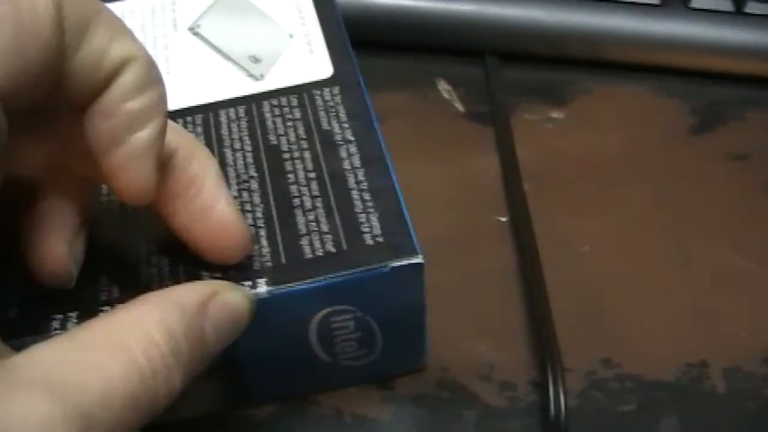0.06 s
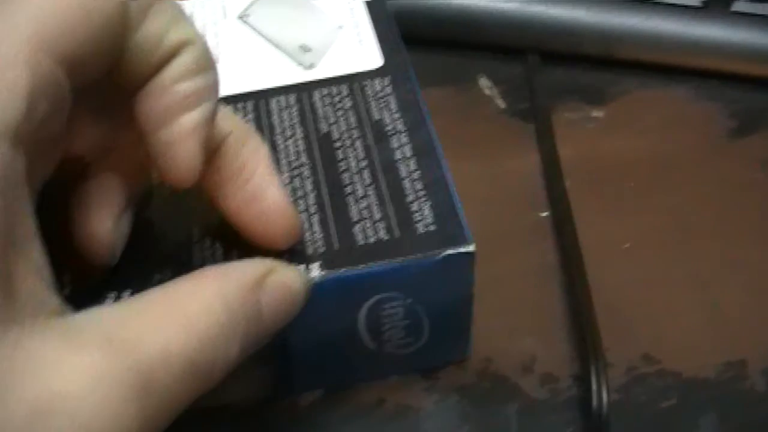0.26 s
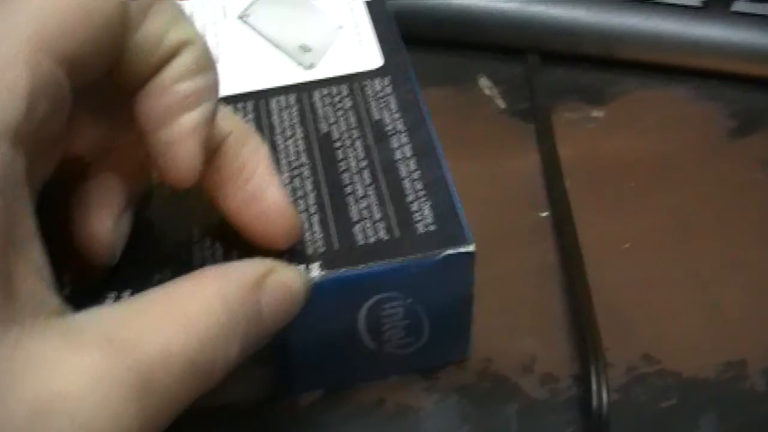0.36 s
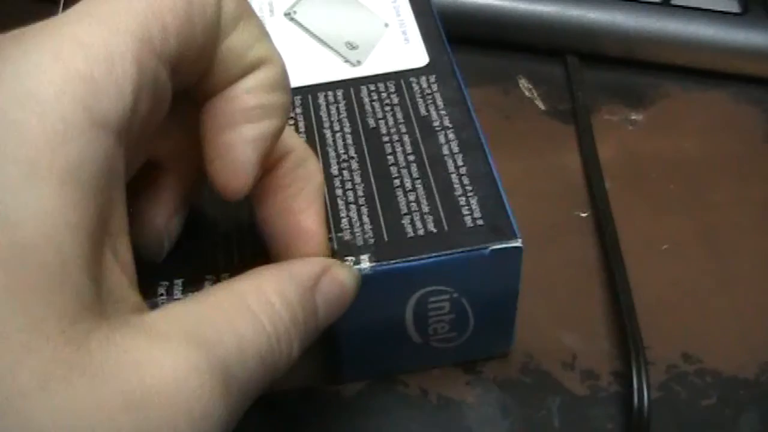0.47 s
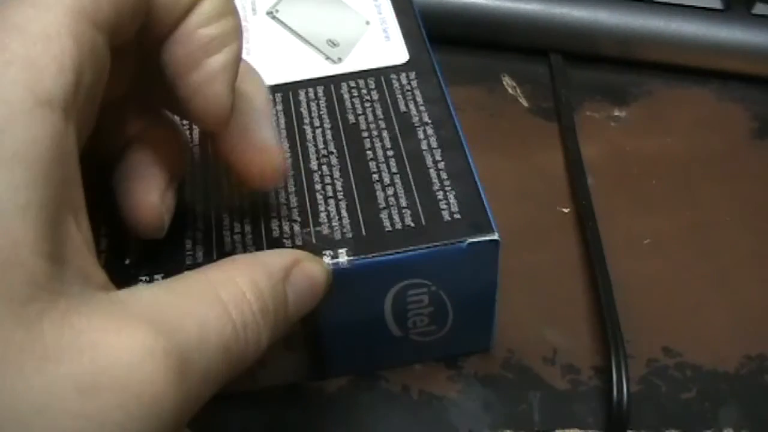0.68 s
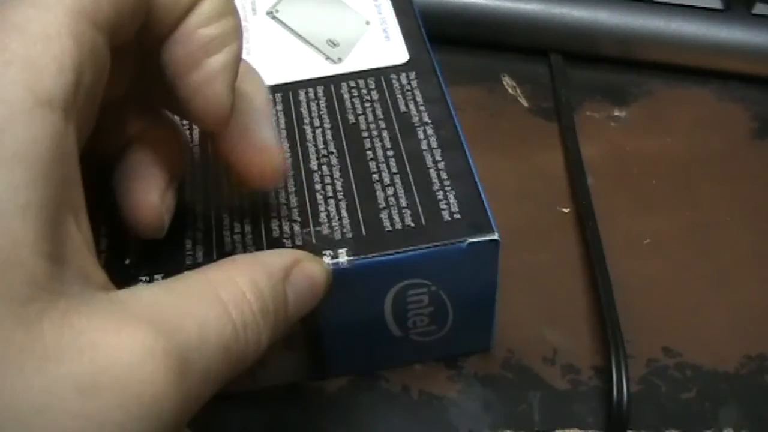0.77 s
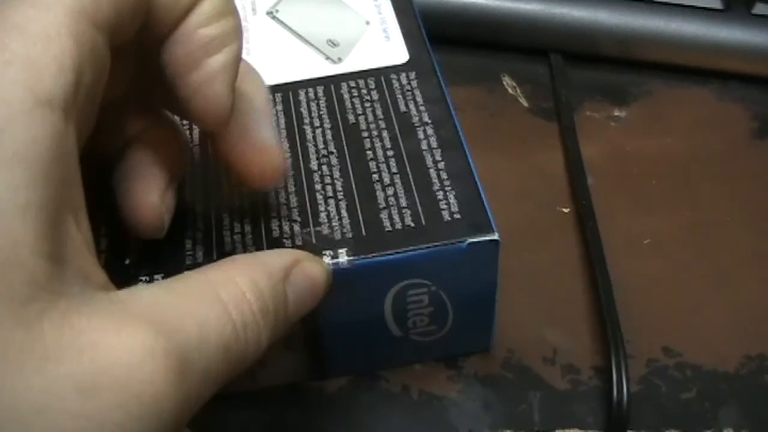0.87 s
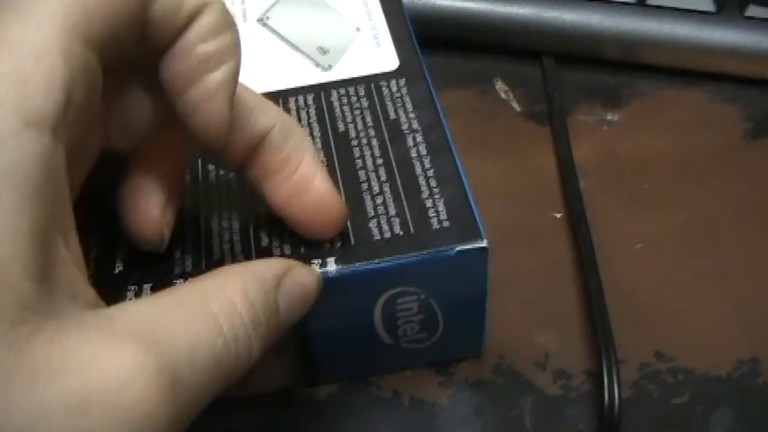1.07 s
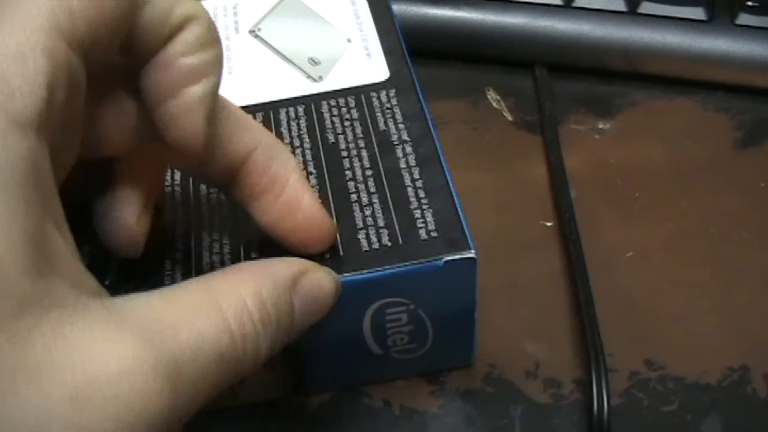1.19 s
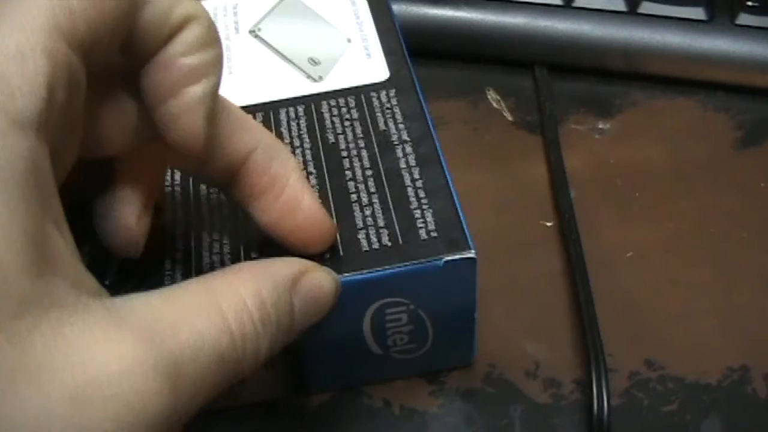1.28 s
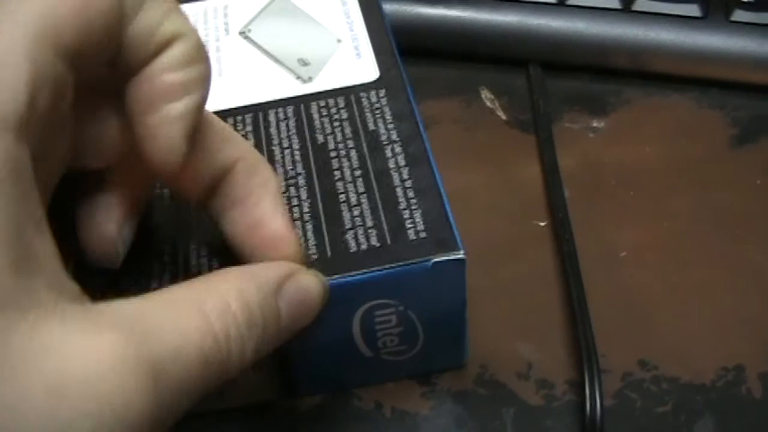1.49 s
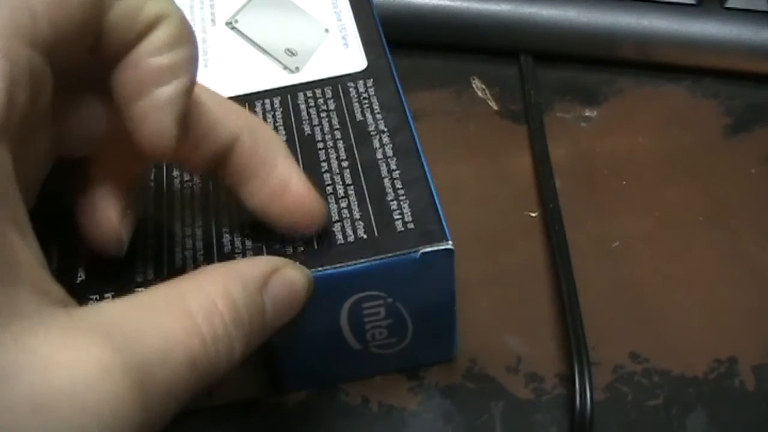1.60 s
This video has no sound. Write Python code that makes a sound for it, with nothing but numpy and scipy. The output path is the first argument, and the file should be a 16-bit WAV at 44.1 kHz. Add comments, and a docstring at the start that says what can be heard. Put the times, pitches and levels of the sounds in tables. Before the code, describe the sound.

Fingernails pick at a small cardboard box, heard close in stereo. After quiet hiss and barely audible ticks, a loud, sharp, hollow click snaps at 0.23 s. Faint taps and rubs follow, slightly clearer at 0.57 s. A crackly, weaker cluster of clicks comes at 1.0 s, then small ticks from 1.13 to 1.26 s, and soft dry scratching until about 1.6 s. Short small-room tail.

```python
"""Fingernails pick and scratch at the sticker seal of a small cardboard box on a desk, close to a stereo microphone.
Each nail slip or tap is a click that rings the modes of the box; rubs of the fingertips over the printed card
are dense noise grains under a swell, sent through the same modes.
A small quiet room answers with a short tail of noise over a soft, slowly stirring hiss shaped in bands."""
import sys
import numpy as np
from scipy import signal
from scipy.fft import rfft, irfft, next_fast_len
from scipy.io import wavfile

SR = 44100
rng = np.random.default_rng(int(sys.argv[2]) if len(sys.argv) > 2 else 0)


def dump_mix(stems):
    """Bounce the given channels to the path in sys.argv[1] as a 16-bit WAV at rate SR."""
    frames = np.atleast_2d(stems).T  # one column per channel
    limited = np.clip(frames, -1, 1)  # hard clip at full scale
    pcm = np.round(limited * 32767).astype(np.int16)
    wavfile.write(sys.argv[1], SR, pcm)


N = 72765  # length in samples


def from_db(db):
    """Gain of a level in dB."""
    return 10 ** (np.asarray(db) / 20)


def rms_one(x):
    """Scale to rms 1."""
    return x / np.sqrt(np.mean(x ** 2) + 1e-20)


def at_hz(where_hz, values, hz):
    """Read a curve on a log-frequency axis."""
    return np.interp(np.log(hz), np.log(where_hz), values)


def drift(rate_hz):
    """Slow random wander of rms 1: noise low-passed near rate_hz, drawn at every 40th sample."""
    pole = np.exp(-2 * np.pi * rate_hz * 40 / SR)
    noise = rng.standard_normal(N // 40 + 2002)
    slow = signal.lfilter([1], [1, -2 * pole, pole * pole], noise)[2000:]  # drop the filter's start-up
    slow = rms_one(slow - slow.mean())
    return np.interp(np.arange(N) / 40, np.arange(len(slow)), slow)


def bands(noise):
    """Split two unrelated noises in turn into half-octave bands; yields centre Hz and band."""
    edges_hz = 24 * 2 ** np.arange(0, 9.6, .5)
    for k, (low, high) in enumerate(zip(edges_hz, edges_hz[1:])):
        band_pass = signal.butter(2, [low, high], "band", fs=SR, output="sos")
        yield np.sqrt(low * high), signal.sosfilt(band_pass, noise[k % 2])


def spread(mid, side, alike):
    """Left and right from two noises with the given likeness (1 = mono)."""
    alike = np.clip(alike, -1, 1)
    centre = np.sqrt(1 + alike) * mid
    wide = np.sqrt(1 - alike) * side * [[1], [-1]]
    return (centre + wide) / np.sqrt(2)


# EQ curve of the centred hiss, relative: f/Hz, level/dB
HISS_CENTRE = [(15, -41), (25, -15), (217, -0.5), (560, -5.5), (734, -9.5), (887, -13), (2160, -12.5),
               (2410, -13.5), (4030, -17.5), (16000, -30.5)]
# EQ curve of the wide hiss, opposite in left and right, relative: f/Hz, level/dB
HISS_WIDE = [(15, -37), (25, -12), (76, -3), (416, -4.5), (796, -8.5), (936, -12), (1020, -9),
             (14000, -32.5), (16000, -40.5)]
# level ride of the centred hiss: t/s, level/dB, treble tilt above STIR_SPLIT_HZ/dB
STIR = [(0, -58.5, 0), (.2, -59.5, -1), (.4, -56, -1), (.6, -58, -2), (.8, -57, -2), (0.951, -56.5, -3.5),
        (1.1, -57, -3), (1.25, -57.5, 0.5), (1.5, -63, 1.5), (1.65, -58.5, -0.5)]
STIR_SPLIT_HZ, STIR_LUMPY_DB = 930, 3.0  # the lumps wander below the split
HISS_PATCHY_DB, HISS_WIDE_DB = 0.53, -53.5


def hiss():
    """Bed of room, microphone and hands resting on the box: a riding centre, lumpy in the bass, and a steady wide part."""
    t, centre, wide = np.arange(N) / SR, 0, 0
    ride_s, level_db, treble_db = np.transpose(STIR)
    lumps = drift(10)
    for hz, (mid, side) in bands(rng.standard_normal((2, 2, N))):
        high = hz ** 2 / (hz ** 2 + STIR_SPLIT_HZ ** 2)  # soft crossover, 0 in the bass to 1 in the treble
        moving_db = high * np.interp(t, ride_s, treble_db) + (1 - high) * STIR_LUMPY_DB * lumps
        centre_db = at_hz(*np.transpose(HISS_CENTRE), hz) + moving_db + HISS_PATCHY_DB * drift(8.4)
        wide_db = at_hz(*np.transpose(HISS_WIDE), hz) + HISS_PATCHY_DB * drift(11)
        centre = centre + mid * from_db(centre_db)
        wide = wide + side * from_db(wide_db)
    centre = rms_one(centre) * from_db(np.interp(t, ride_s, level_db))
    return centre + from_db(HISS_WIDE_DB) * rms_one(wide) * [[1], [-1]]


# room tail before a 20 dB trim: f/Hz, level/dB, t60/s
TAIL = [(117, -14, 0.42), (283, -15.5, 0.18), (799.4, -20.5, 0.23), (1980, -19, 0.19), (5070, -20, .16),
        (12220, -22, 0.11)]
TAIL_RISE_S, TAIL_LIKENESS = 0.0013, 0.75  # fade-in of the tail; likeness of left and right


def room(x):
    """A half-second stereo tail of noise, each band dying at its own rate, convolved with the box."""
    size = SR // 2
    t, tail = np.arange(size) / SR, 0
    hz, level_db, t60_s = np.transpose(TAIL)
    for centre_hz, (mid, side) in bands(rng.standard_normal((2, 2, size))):
        start_db = at_hz(hz, level_db, centre_hz) - 20
        fall_db = start_db - 60 * t / at_hz(hz, t60_s, centre_hz)
        tail = tail + from_db(fall_db) * spread(mid, side, TAIL_LIKENESS)
    tail = tail * np.clip(t / TAIL_RISE_S, 0, 1) ** 2
    return signal.fftconvolve(x[None], tail, axes=1)[:, :N]


# pitches of the six level columns in RUBS and PICKS: f/Hz
COLOUR_HZ = [190, 450, 1150, 3000, 6500, 12000]


def colour_at(levels_db, hz):
    """Drive level in dB that a six-point colour gives at a mode's pitch."""
    return at_hz(COLOUR_HZ, levels_db, hz)


# fingertip rubs: start t/s, strongest t/s, end t/s, six drive levels/dB (before the mode's own level)
# rows whose times are out of order sound as a swell cut off at one side, or stay silent
RUBS = [(0.354, 0.393, 0.41, -72, -58.5, -69, -81, -62, -50),
        (0.498, 0.553, 0.61, -72, -66.5, -68, -76, -69, -59),
        (0.666, 0.673, 0.71, -73, -60, -57.5, -61.5, -59.5, -67),
        (0.712, 0.719, 0.716, -59, -63, -67, -69.5, -69, -80),
        (0.87, 0.892, 0.95, -74, -80, -67.5, -81, -66.5, -73),
        (1.006, 0.997, 1.008, -56, -37, -44, -44, -37.5, -46),
        (1.199, 1.224, 1.215, -58, -43, -48, -50, -49.5, -57),
        (1.262, 1.289, 1.434, -79, -59, -62.5, -70, -69, -79),
        (1.307, 1.366, 1.395, -64, -56, -54, -57, -62, -68),
        (1.356, 1.405, 1.452, -66, -58, -64, -56, -54.5, -62),
        (1.448, 1.461, 1.482, -52, -60, -70, -68, -69, -69),
        (1.529, 1.565, 1.575, -77, -59, -55.5, -57, -55, -64),
        (1.563, 1.589, 1.6, -78, -66, -53.5, -46, -49, -60.5),
        (1.597, 1.609, 1.54, -63, -68, -60, -55, -83, -92)]
RUB_SWELL = 0.95  # exponent on the swell
RUB_GRAIN_DB, RUB_FLUTTER_DB = 3.5, 0.5  # mean lift of single grains; depth of the level wander


def rubs(modes_hz):
    """Fingertips over printed card: noise grains of uneven strength under swells, one drive per mode."""
    t = np.arange(N) / SR
    swells = np.array([np.interp(t, row[:3], [0, 1, 0]) ** RUB_SWELL for row in RUBS])
    grain_lift_db = RUB_GRAIN_DB * rng.exponential(1, N)
    grains = rms_one(rng.standard_normal((2, N)) * from_db(grain_lift_db))
    grains = grains * from_db(RUB_FLUTTER_DB * drift(110))
    gains = from_db([colour_at(row[3:], modes_hz) for row in RUBS])
    mode_grains = grains[np.arange(len(modes_hz)) % 2]  # neighbouring modes get unrelated grains
    return (gains.T @ swells) * mode_grains


# nail slips and taps: t/s, six drive levels/dB (rms over PICK_SPAN_S, before the mode's own level),
# direction of push (+1 or -1)
PICKS = [(0.146, -78, -64.5, -68, -71, -65.5, -72, 1), (0.185, -63, -56.5, -56.5, -66, -84, -87, 1),
         (0.2346, -25, -19.5, -17, -20.5, -28, -36.5, -1), (0.2362, -41.5, -21, -27.5, -26.5, -29, -43, -1),
         (0.3653, -53.5, -46.5, -61, -53, -60, -57.5, -1),
         (0.5705, -45, -43.5, -47.5, -47, -52.5, -66.5, 1), (0.6101, -75, -52, -53, -66, -77, -87, 1),
         (0.757, -54, -57.5, -59.5, -82, -84, -84, 1), (0.802, -56, -54, -59.5, -74, -85, -84, 1),
         (0.846, -72, -70, -61, -69, -78, -87, 1), (1.0042, -27.5, -27, -51.5, -45, -46, -52, -1),
         (1.0067, -42, -34.5, -37, -40.5, -41, -35, -1), (1.0071, -47.5, -38, -34.5, -34.5, -36, -51.5, -1),
         (1.0088, -33, -37.5, -23, -40.5, -31, -33.5, -1), (1.1292, -45, -38, -44, -58, -93, -77, -1),
         (1.1323, -70, -65, -61, -76, -66, -73, -1), (1.1616, -53.5, -46.5, -47.5, -55, -59.5, -66, -1),
         (1.2172, -48, -46.5, -51.5, -55, -56, -72, -1), (1.2627, -60, -53.5, -63, -63, -66.5, -77, 1),
         (1.431, -61, -55, -59, -73, -60, -69, 1), (1.459, -52.5, -66, -68, -69, -67, -71, 1),
         (1.627, -48.5, -51.5, -64, -71, -63, -69, 1)]
PICK_SPAN_S, PICK_SCATTER_DB = .01, 1.5


def picks(modes_hz):
    """Nail slipping off the edge: a one-sample push to every mode, with a little chance in each level."""
    clicks = np.zeros((len(modes_hz), N))
    for s, *colour_db, way in PICKS:
        luck_db = PICK_SCATTER_DB * rng.standard_normal(len(modes_hz))
        strength = from_db(colour_at(colour_db, modes_hz) + luck_db)
        clicks[:, int(s * SR)] += np.sign(way) * np.sqrt(PICK_SPAN_S * SR) * strength
    return clicks


# ringing modes of the cardboard box: f/Hz, level/dB, t60/s
BOX = [(92.4, -4, 0.063), (149, -1, 0.053), (254, 3.5, 0.054), (376, 2, 0.046), (493, 2.5, 0.018),
       (874.6, 2, 0.031), (1025, 1, 0.018), (1372, -0.5, 0.017), (1580, 2, 0.016), (2090, -2, 0.0081),
       (2472, -1.5, 0.019), (2882, 0, 0.011), (3610, 1.5, 0.0067), (4180, 1.5, 0.011), (4940, -1.5, 0.0064),
       (6480, 2.5, 0.0029), (8250, 2, 0.0023), (9630, 4.5, .002), (12000, 3, 0.0024), (13900, -2, 0.0021)]
BOX_LOW_CUT_HZ = 83


def box():
    """Cardboard body: a bank of decaying two-pole resonators driven by the rubs and picks."""
    modes_hz = np.array([row[0] for row in BOX])
    pushes = rubs(modes_hz) + picks(modes_hz) + 1e-18  # tiny offset keeps the filters out of denormals
    ringing = np.zeros(N)
    for k, (hz, level_db, t60_s) in enumerate(BOX):
        r, w = from_db(-60 / (t60_s * SR)), 2 * np.pi * hz / SR
        # the sign alternates from mode to mode
        gain = (-1) ** k * from_db(level_db) * np.sin(w) * np.sqrt(1 - r * r)
        ringing += signal.lfilter([gain], [1, -2 * r * np.cos(w), r * r], pushes[k])
    low_cut = signal.butter(2, BOX_LOW_CUT_HZ, "high", fs=SR, output="sos")
    return signal.sosfilt(low_cut, ringing)


LEFT_LAG_S, PAN_DB = .000015, 0.4  # left is later by the lag; left up and right down by the pan


def at_microphone(near):
    """The box reaches the two microphone ports a few microseconds apart, by a phase turn growing with pitch."""
    size = next_fast_len(N + 64)
    hz = np.arange(size // 2 + 1) * SR / size
    turn = np.exp(-1j * np.pi * hz * LEFT_LAG_S * np.array([[1], [-1]]))  # half the lag each way
    return irfft(rfft(near, size) * turn, size)[:, :N] * from_db([[PAN_DB], [-PAN_DB]])


def scene():
    """Direct box, its room tail and the hiss bed summed in stereo."""
    near = box()
    return at_microphone(near) + room(near) + hiss()


CUTOFF_HZ = 16600


def record(dry):
    """Peaks are clipped at 0.95 and a steep low-pass cuts the top."""
    top_cut = signal.cheby2(16, 70, CUTOFF_HZ, fs=SR, output="sos")
    return signal.sosfilt(top_cut, np.clip(dry, -.95, .95))


dry = scene()
out = record(dry)
dump_mix(out)
```